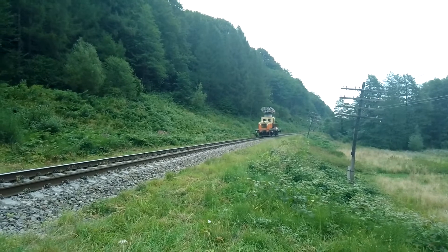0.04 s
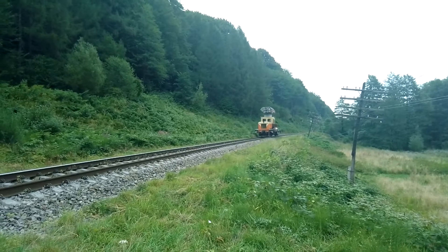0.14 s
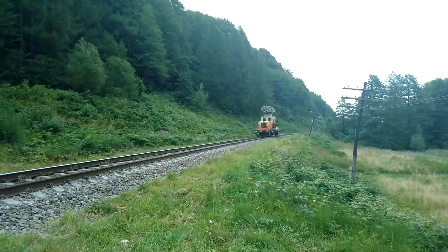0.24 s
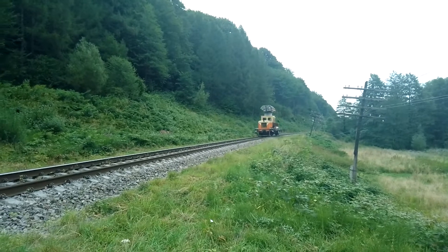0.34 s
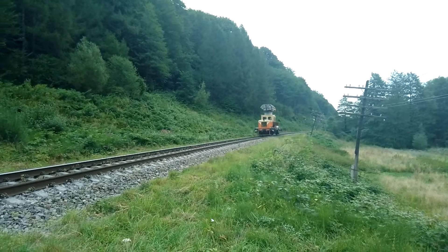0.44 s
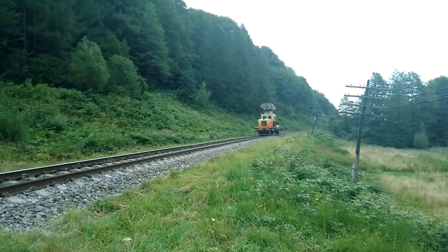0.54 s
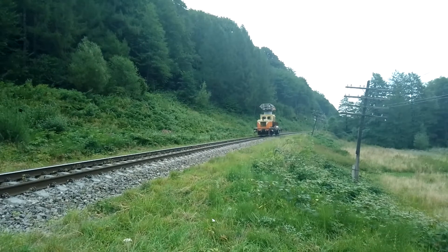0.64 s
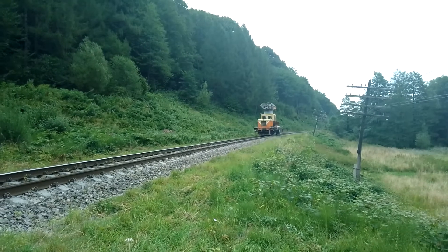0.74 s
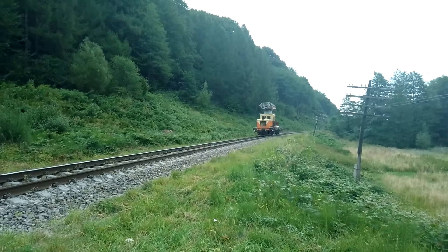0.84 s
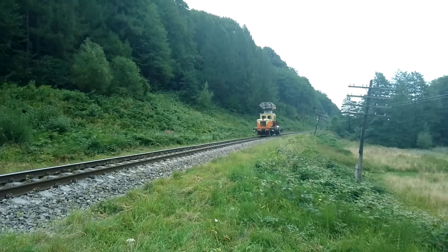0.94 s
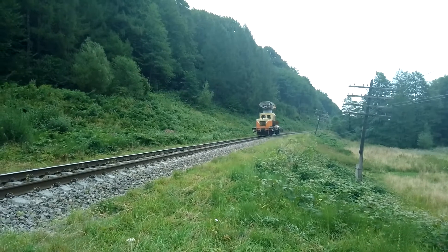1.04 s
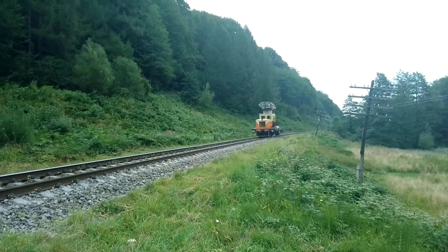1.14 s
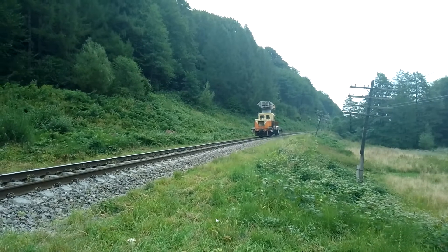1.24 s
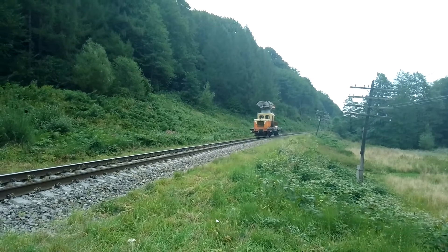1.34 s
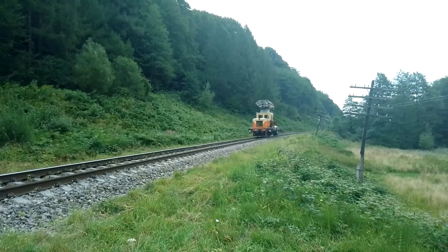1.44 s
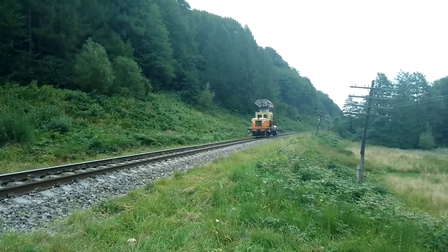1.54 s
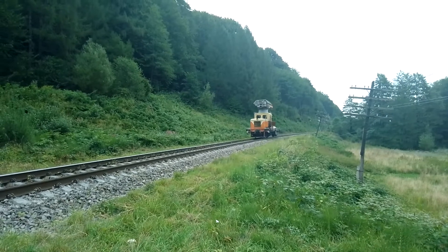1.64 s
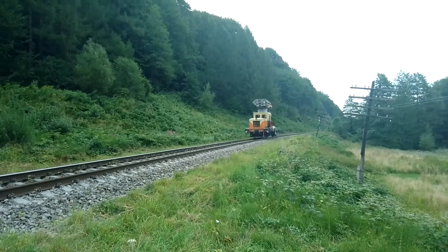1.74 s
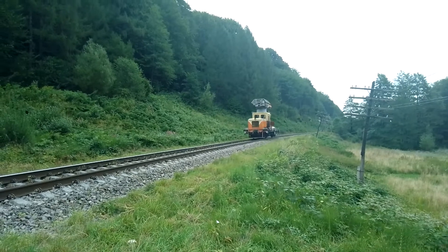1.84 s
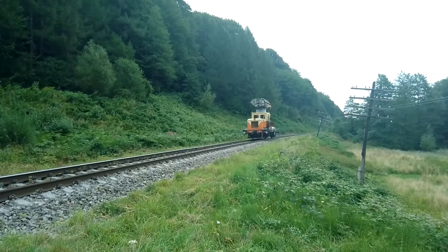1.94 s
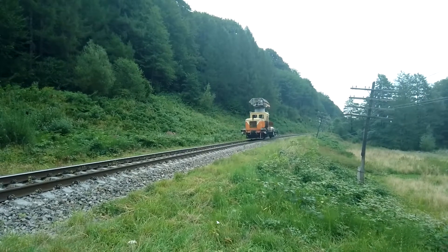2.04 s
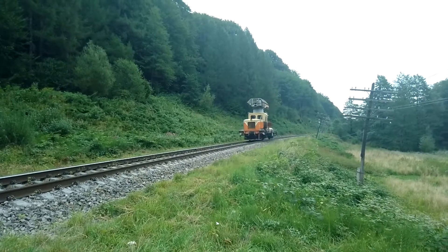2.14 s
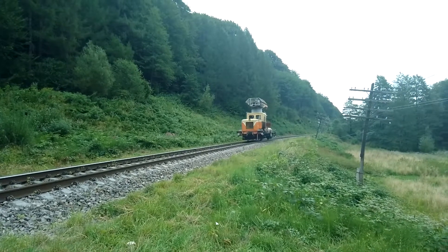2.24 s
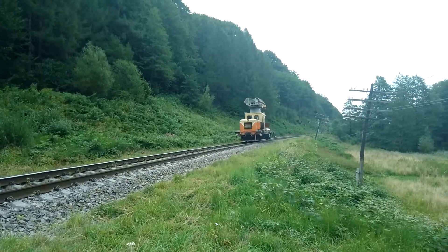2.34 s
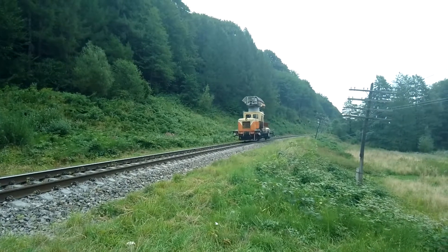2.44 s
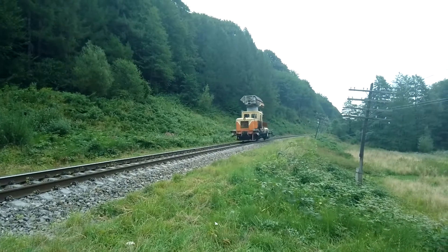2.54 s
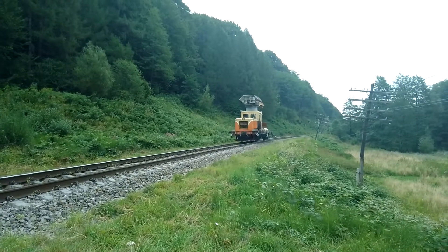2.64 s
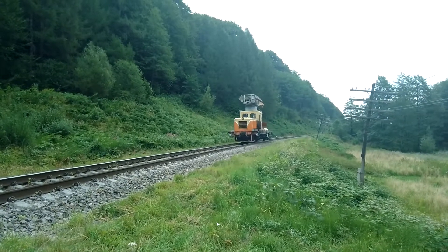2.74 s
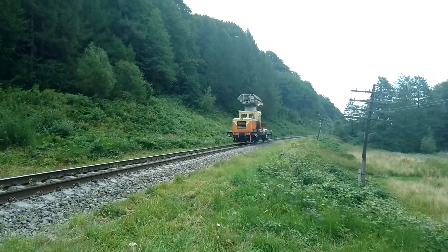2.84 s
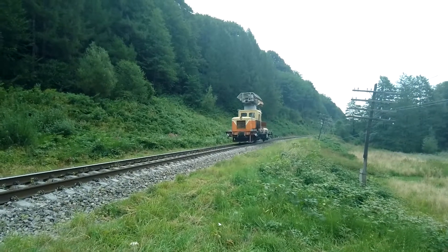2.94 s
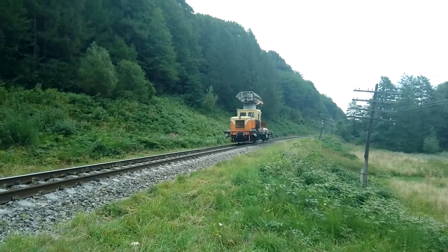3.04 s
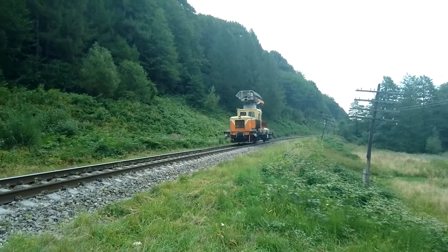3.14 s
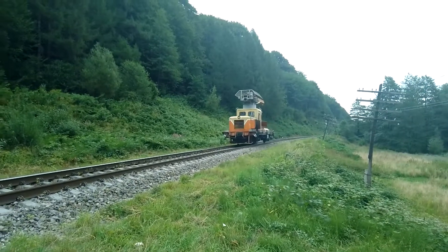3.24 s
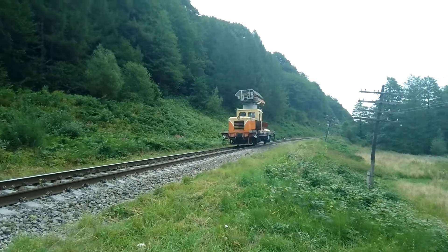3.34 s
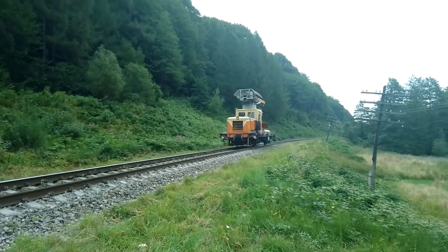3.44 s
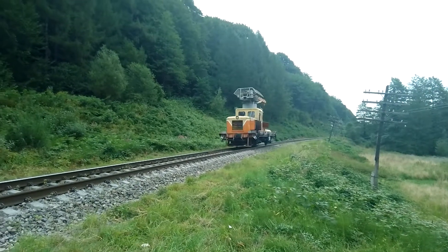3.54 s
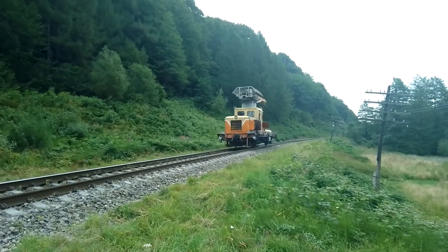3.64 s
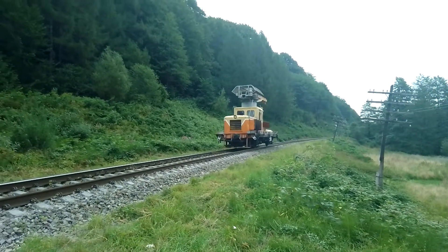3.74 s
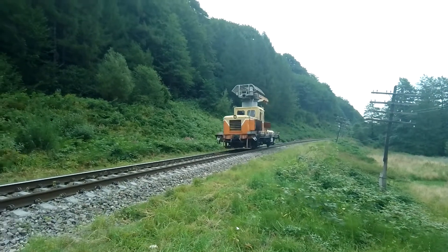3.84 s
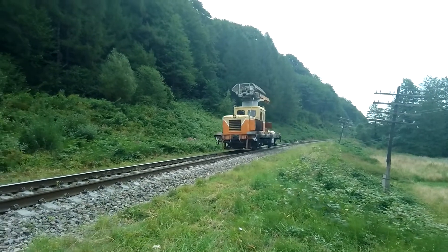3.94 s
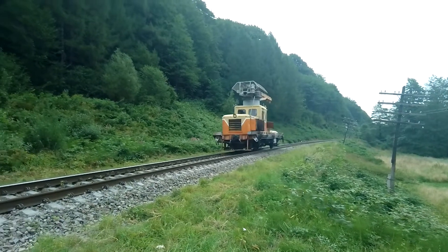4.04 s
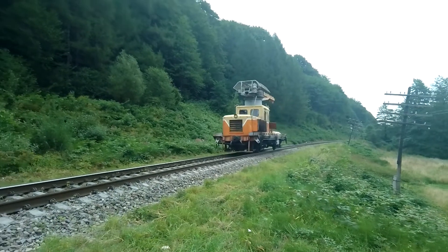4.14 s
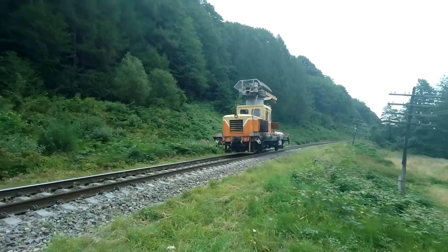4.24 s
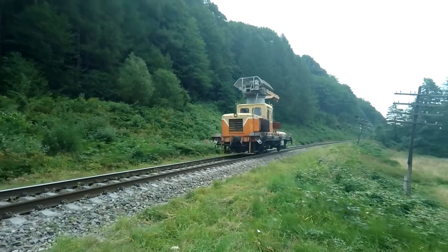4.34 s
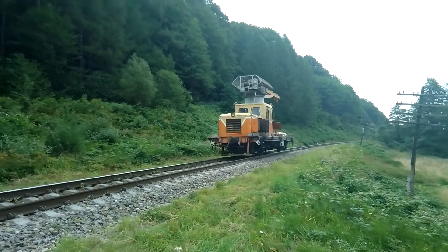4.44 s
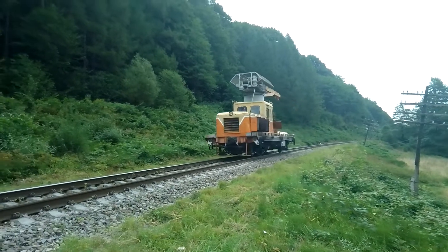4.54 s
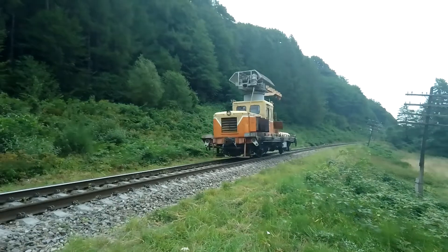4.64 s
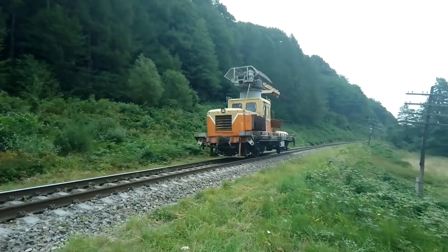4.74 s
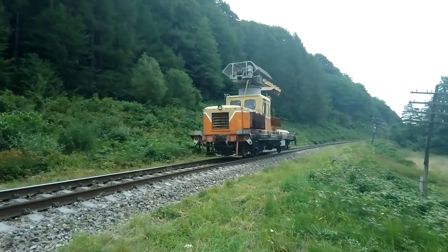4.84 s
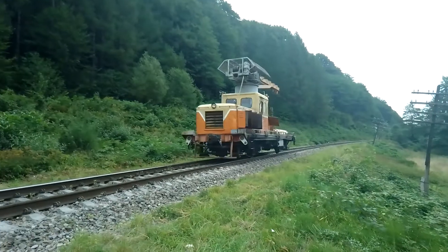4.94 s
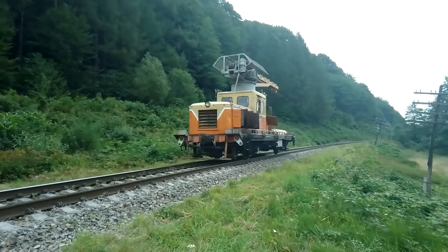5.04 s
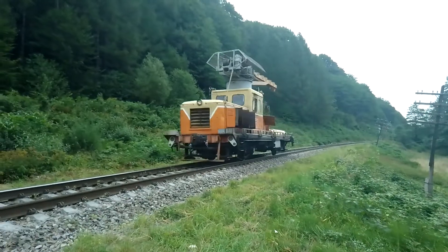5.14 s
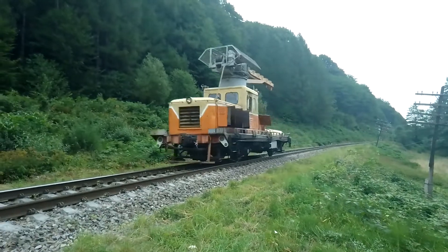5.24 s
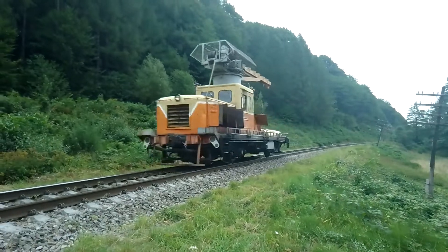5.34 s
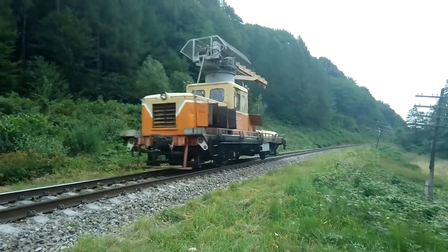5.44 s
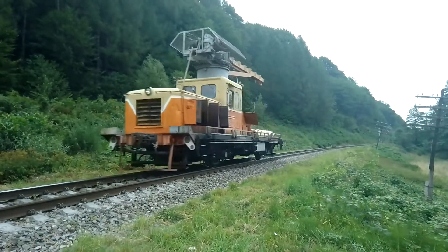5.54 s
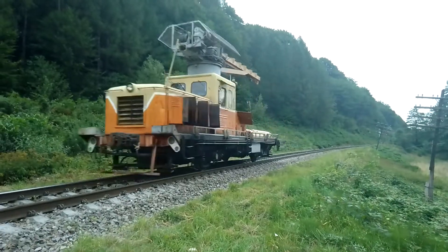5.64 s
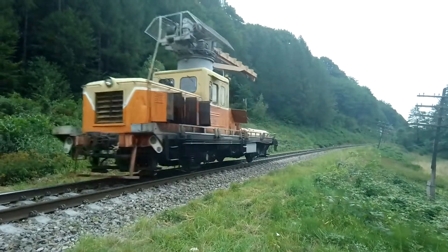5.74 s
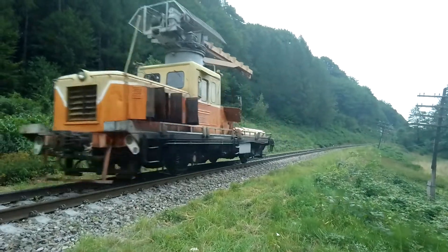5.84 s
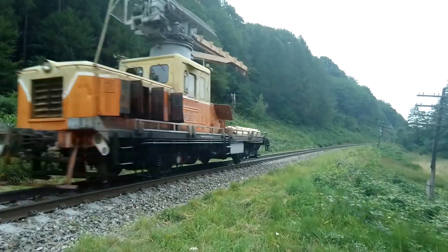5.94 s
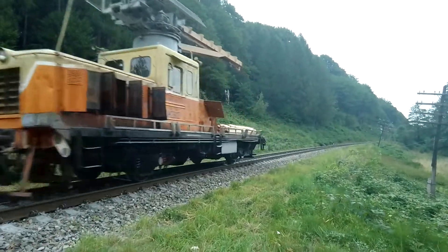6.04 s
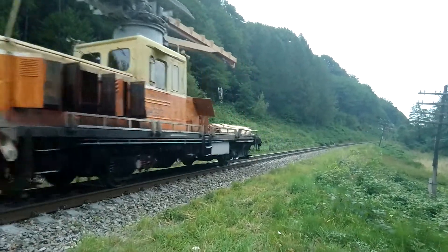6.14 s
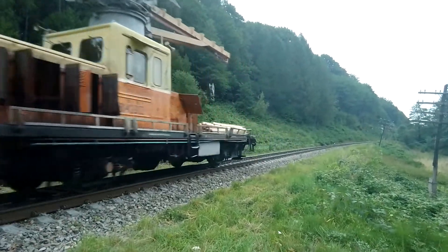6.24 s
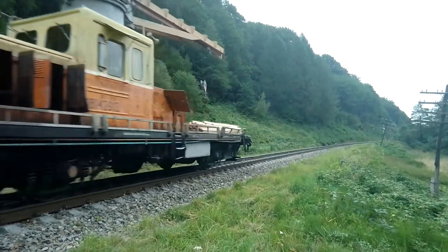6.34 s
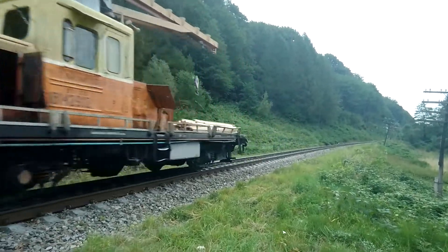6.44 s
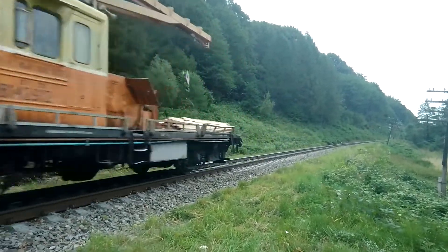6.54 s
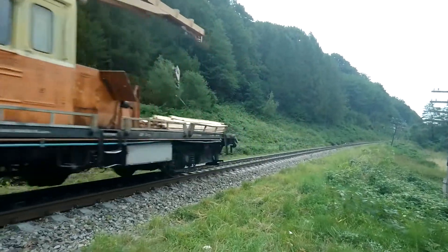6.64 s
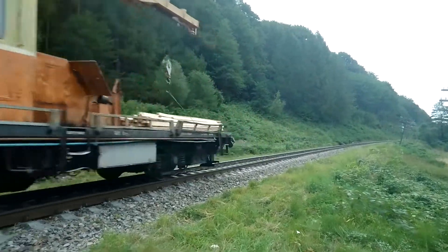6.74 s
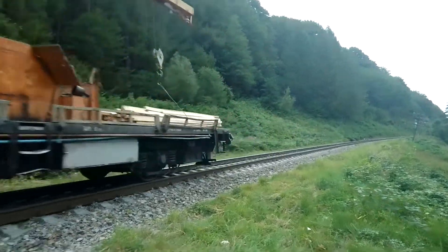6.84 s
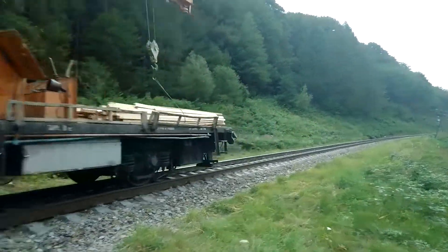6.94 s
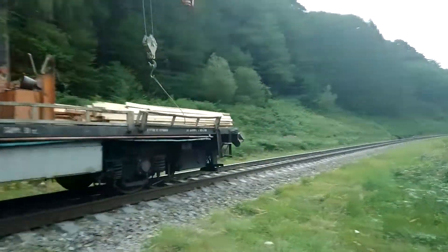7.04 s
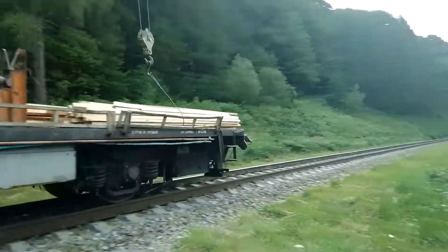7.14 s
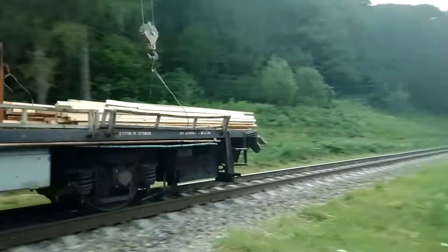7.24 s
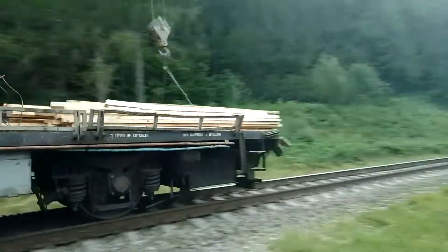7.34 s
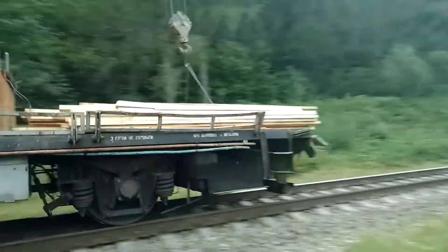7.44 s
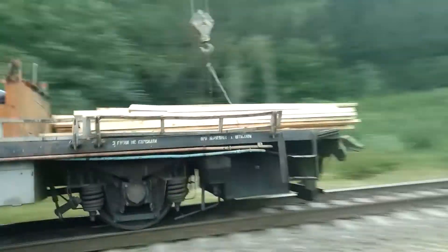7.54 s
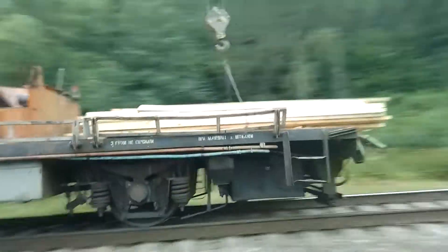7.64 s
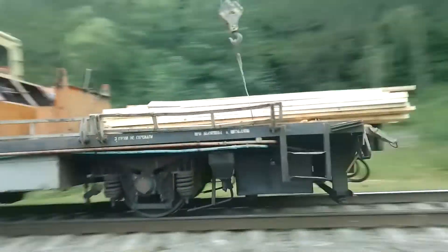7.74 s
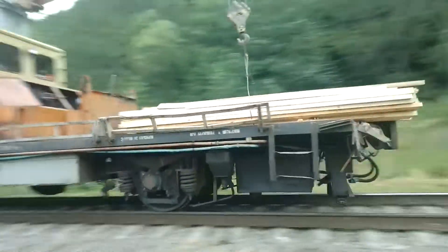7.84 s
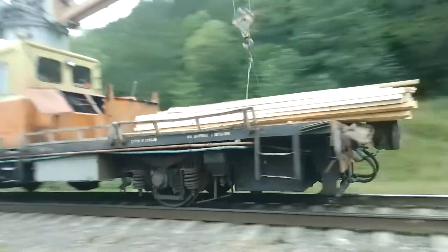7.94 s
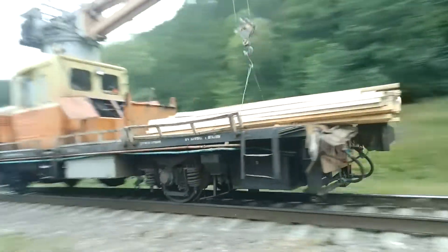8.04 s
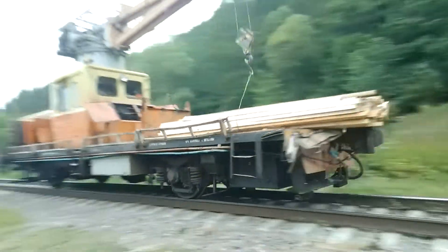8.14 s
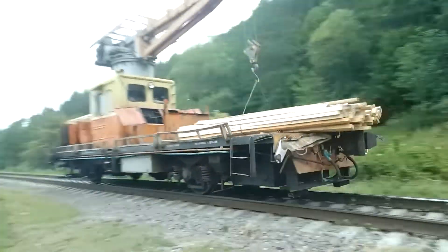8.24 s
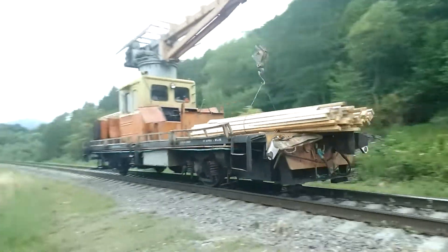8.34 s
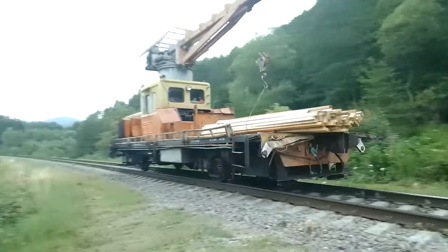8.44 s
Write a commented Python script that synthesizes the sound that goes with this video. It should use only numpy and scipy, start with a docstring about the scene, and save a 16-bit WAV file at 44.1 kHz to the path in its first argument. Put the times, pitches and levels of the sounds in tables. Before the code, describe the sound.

A diesel railcar chugs nearer along an outdoor track, growing loud and clanking as it passes, its pitch dipping slightly.

```python
"""A diesel railcar with a crane chuffs along a forest track, passes close by and draws away.
Its exhaust pulses once per engine cycle, a harmonic series over the roar of block, wheels and rails.
Gears hum, injectors and fan hiss, loose steel clanks, a valve cover pings and a light wind touches
the microphone. The Doppler effect lowers the pitch as the car goes by; spherical spreading and
loss over the grass weaken it with distance."""
import sys
import numpy as np
from scipy import signal
from scipy.fft import rfft, irfft, next_fast_len
from scipy.io import wavfile
from scipy.ndimage import uniform_filter1d, map_coordinates

SR = 44100
rng = np.random.default_rng(int(sys.argv[2]) if len(sys.argv) > 2 else 0)


def digitize_waveform(pressure):
    """Quantize a signal to 16-bit integers and store it at the path in sys.argv[1].

    Rows of a 2-D input are taken as channels; values are limited to [-1, 1].
    """
    field = np.atleast_2d(pressure).T
    bounded = np.clip(field, -1, 1)
    quanta = np.round(bounded * 32767).astype(np.int16)
    wavfile.write(sys.argv[1], SR, quanta)


N = 373968
TIME = np.arange(N) / SR
CYCLES_PER_S, SPEED_M_S, SOUND_M_S = 13.533, 9.24, 343
NEAREST_M, ABREAST_S = 8.4, 6.65

# Each row: harmonic of the cycle, then its level in dB in each view (far, nose close, abreast, behind).
EXHAUST_HARMONICS = [(2, -22, -30, -32, -31), (3, -6, -18.5, -18, -25), (4, -23, -24, -30, -18),
                     (5, -0.5, -12.5, -14, -19), (6, 2.5, -12.5, -8, -14.5), (7, -5, -18, -9.5, -12),
                     (8, -21.5, -6, -6, -17.5), (9, -55, -23.5, -10, -43), (10, -17.5, -23, -23, -26),
                     (11, -28.5, -2.5, -19, 1.5), (12, -44, -18, -21, -32), (13, -18, -18.5, -15, -19),
                     (14, -29, -12, -21.5, -11.5), (15, -18, -37, -21, -12), (16, -20.5, -18, -14.5, -13.5),
                     (17, -30, -17, -40, -9.5), (19, -52, -37, -34, -52), (22, -29, -48, -24.5, -12)]
# Turbulence in the pipe, one spectrum far and one near. Each point: frequency in Hz, relative level in dB.
PIPE_SPECTRA = [
    [(10, -22), (40, -6), (80, 0), (130, -4.5), (220, -5), (300, -25), (600, -74), (2000, -120)],
    [(10, -29), (40, -19), (90, -2.5), (150, 1), (230, -8.5), (310, -13.5), (600, -65.5), (2000, -120)],
]

def exhaust(cycle, view, level_db):
    """Superposition: one cylinder chuffs hardest, so the harmonics nearly align once a cycle."""
    chuff_at = blend(view, (.47, .5, .28, .45))  # share of the cycle
    angle = 2 * np.pi * (cycle - chuff_at)
    chuffs = np.zeros(N)
    for harmonic, *view_db in EXHAUST_HARMONICS:
        waver_db = 1.2 * wobble(4) + .15 * harmonic * wobble(16)
        smear_rad = rng.normal(1.3, .5) + .4 * wobble(2)
        chuffs += np.sqrt(2) * amp(blend(view, view_db) + waver_db) * np.cos(harmonic * angle + smear_rad)
    noise = patchy_noise(depth_db=2.5)
    rumble = blend(view, [coloured(noise, points) for points in PIPE_SPECTRA])
    rumble_db = blend(view, [-6.5, -7, -5, -5])
    return amp(level_db) * (chuffs + amp(rumble_db) * rumble)


# Block, wheels and rails, one spectrum per view. Each point: frequency in Hz, relative level in dB.
ROAR_SPECTRA = [
    [(150, -52), (260, -14), (480, -19.5), (670, -7.5), (800, -7.5), (920, -11.5), (1060, -15.5),
     (1400, -9.5), (1800, -20), (2600, -26), (3400, -51), (5700, -120)],
    [(150, -38), (260, -6), (500, -6), (640, 3), (875, 2), (1110, -9.5), (1390, -1.5), (1800, -11.5),
     (2600, -36), (3400, -43), (5700, -120)],
    [(150, -40), (260, -1.5), (440, -3), (570, -11), (800, -1), (1230, -10.5), (1600, -7), (2080, -15),
     (2600, -17), (3400, -40), (5700, -120)],
    [(150, -29), (260, -3), (390, -9), (500, -12), (850, -4.5), (1290, -14), (1610, -12), (2600, -22.5),
     (3400, -44), (5700, -120)],
]

def roar(cycle, view, level_db):
    """Amplitude modulation: the firings make the broad noise of block, wheels and rails throb a little."""
    noise = patchy_noise(depth_db=0.46)
    layers = [coloured(noise, points) for points in ROAR_SPECTRA]
    # Every view gets the same power in the middle band.
    layers = [x / np.std(filtered(x, lambda hz: (hz > 450) & (hz < 1900))) for x in layers]
    throb = pulses(cycle, count=3, at=0.898, sharp=0.051) * pulses(cycle, count=1, at=0.95, sharp=0.055)
    return amp(level_db + 0.84 * wobble(16)) * throb * blend(view, layers)


# Each row: multiple of the cycle, centre time and half length in seconds, level in dB against the roar.
GEAR_TONES = [(46.4, 1.4, 2, -17), (55.4, 0.75, 3.3, -9), (64.8, 0.84, 3.1, -13.5), (71.7, 3.3, 1.8, -17),
              (55.5, 6.3, 0.47, -5.5), (29.3, 6.15, 0.24, -14), (21.58, 7.0, 0.38, -12.5),
              (21.97, 7.6, 0.35, -4), (32.1, 7.94, 0.95, -9.5), (64, 8.6, 0.26, -12)]

def gears(cycle, level_db):
    """Periodic meshing of teeth gives unsteady tones, each heard over one stretch of the pass."""
    hum = np.zeros(N)
    for multiple, centre, half, db in GEAR_TONES:
        swell = amp(db + 2.5 * wobble(8)) * bell(centre, half, power=4)
        hum += swell * np.sin(2 * np.pi * multiple * cycle + 1.2 * wobble(12))
    return amp(level_db) * np.sqrt(2) * hum


# Injectors and fan, one spectrum per view. Each point: frequency in Hz, relative level in dB.
HISS_SPECTRA = [
    [(1000, -39), (1700, -24), (2000, -3.5), (2550, -4.5), (3050, -7), (3320, -6), (4150, -9.5),
     (4860, -18), (5600, -30), (6400, -32.5), (7500, -27), (10600, -55), (12500, -70), (15700, -66)],
    [(1000, -29), (1700, -14.5), (2100, 0), (2800, -3.5), (3600, -1.5), (4400, -7.5), (5500, -18.5),
     (6500, -26.5), (7600, -21.5), (10500, -37.5), (12000, -54), (15700, -44.5)],
    [(1000, -1.5), (1700, -5.5), (2090, -3.5), (2730, -5.5), (3820, -4), (5390, -16), (7820, -21.5),
     (11900, -47.5), (15700, -40)],
    [(1000, -2.5), (1700, -2.5), (2100, -5), (2700, -4.5), (3800, -2), (5400, -17.5), (7800, -22),
     (11900, -49), (15700, -47)],
]

def hiss(cycle, view, level_db):
    """Broadband noise of injectors and fan, weakly modulated by the firings."""
    noise = patchy_noise(depth_db=0.83)
    throb = pulses(cycle, count=3, at=0.8, sharp=0.055)
    flicker_db = 0.72 * wobble(16) + 0.76 * wobble(60)
    layers = [coloured(noise, points) for points in HISS_SPECTRA]
    return amp(level_db + flicker_db) * throb * blend(view, layers)


# Single blows of loose steel. Each row: start in seconds, body and treble levels in relative dB.
STEEL_CLANKS = [(4.541, -13, -24.5), (4.5604, -26, -30.5), (4.571, -16, -43), (4.7884, -15.5, -40),
                (4.8145, -22, -44), (5.0844, -25.5, -32), (5.243, -16, -22.5), (5.6184, -13, -41),
                (6.1878, -7, -35), (6.4812, -2.5, -24.5), (6.634, -4.5, -20), (6.7894, -3, -24),
                (6.9227, -12, -39), (7.0814, -3.5, -39), (7.2284, -8.5, -41), (7.6156, -10, -38),
                (7.644, -9, -35), (7.6744, -9, -32), (7.7493, -6, -28)]
# A part knocks once a cycle. Each row: start and end in seconds, body and treble levels in relative dB.
KNOCK_SPELLS = [(5.75, 6.4, -10, -42), (7.3, 7.6, -5.5, -37), (7.83, 8.35, -9, -41)]
# Resonances of the frame. Each row: frequency in Hz, bandwidth in Hz, relative level in dB.
FRAME_MODES = [(420, 120, 0.5), (774, 184, 9), (1570, 480, 2.5), (2300, 150, 2.5), (3550, 1200, -3.5)]

def loose_steel(cycle):
    """Impact excitation: each blow sets off a decaying rattle in the frame and a shorter bright edge."""
    def frame_response(hz):
        modes = sum((-1) ** k * amp(db) * 1j * hz * width / (centre ** 2 - hz ** 2 + 1j * hz * width)
                    for k, (centre, width, db) in enumerate(FRAME_MODES))
        return modes / (1 + (hz / 5500) ** 4)

    clank_t60_s, knock_t60_s = 0.12, 0.088
    knock_times = once_a_cycle(cycle, at=.26) / SR
    scatter_db = rng.normal(0, 2, len(knock_times))
    blows = [(*row, clank_t60_s) for row in STEEL_CLANKS]
    for start, end, body_db, treble_db in KNOCK_SPELLS:
        blows += [(when, body_db + db, treble_db + db, knock_t60_s)
                  for when, db in zip(knock_times, scatter_db) if start < when < end]
    body, edge = np.zeros((2, N + SR))
    age = np.arange(SR // 4) / SR
    rise = 1 - np.exp(-(age / 0.0046) ** 2)
    for start, body_db, treble_db, t60 in blows:
        body[round(start * SR):][:len(age)] += amp(body_db - 60 * age / t60) * rise
        edge[round(start * SR):][:len(age)] += amp(treble_db - 60 * age / (0.44 * t60)) * rise
    rattle = unit(filtered(rng.standard_normal(N), frame_response))
    treble_spectrum = [(3000, -23), (5000, -3.5), (8000, 0), (11500, -23.5), (15500, -33)]
    treble = coloured(rng.standard_normal(N), treble_spectrum)
    return amp(-6.5) * body[:N] * rattle + amp(-4.5) * edge[:N] * treble


# Each row: frequency in Hz, time to decay by 60 dB in seconds, then relative level in dB in each view.
COVER_MODES = [(2320, .1, 5, -9, -4, -9), (2430, .06, -2, -9, 2, -8), (2760, .045, -5, -2, -7, -8),
               (3270, .06, -4, -6, -8, -8)]

def valve_cover(cycle, view, level_db):
    """Damped free vibration: a valve strikes once a cycle and each mode rings at a new strength."""
    strikes = once_a_cycle(cycle, at=.8)
    view = np.interp(view, [0, .75, .93, 1, 3], [0, 0, 1, 1, 3])  # the colour turns late in the approach
    age = np.arange(SR // 10) / SR
    rise = 1 - np.exp(-(age / .002) ** 2)
    pings = np.zeros(N)
    for hz, t60, *view_db in COVER_MODES:
        blows = np.zeros(N)
        blows[strikes] = amp(rng.normal(0, 3.5, len(strikes)))
        ring = rise * amp(-60 * age / t60) * np.sin(2 * np.pi * hz * age)
        pings += amp(blend(view, view_db)) * unit(signal.fftconvolve(blows, ring)[:N])
    return amp(level_db - 12) * pings


# Each row: centre time in seconds, level in dB, half length in seconds.
WIND_PUFFS = [(1.65, -36, 0.094), (2.5, -47, 0.023), (2.417, -38, 0.15), (2.874, -27.5, 0.038),
              (5.204, -23, 0.015), (5.35, -35, 0.049), (6.645, -28, .06)]

def wind():
    """Turbulent pressure at the microphone makes short puffs of low noise."""
    puffs = sum(amp(db) * bell(centre, half) for centre, db, half in WIND_PUFFS)
    spectrum = [(15, -20), (40, -7), (120, 13.5), (250, -4.5), (600, -48.5), (2000, -120)]
    return puffs * coloured(rng.standard_normal(N), spectrum)


def amp(db):
    """Amplitude ratio of a level in dB."""
    return 10 ** (np.asarray(db) / 20)


def unit(x):
    """Normalisation to rms 1."""
    return x / np.sqrt(np.mean(x ** 2) + 1e-20)


def bell(centre_s, half_s, power=2):
    """A Gaussian envelope; a higher power flattens its top."""
    return np.exp(-((TIME - centre_s) / half_s) ** power)


def wobble(rate):
    """Spline interpolation through random knots, rate of them a second."""
    return map_coordinates(rng.standard_normal(int(N * rate / SR) + 4), [TIME * rate])


def filtered(x, response):
    """Linear filtering: the spectrum of x times a frequency response."""
    size = next_fast_len(N + SR // 2)
    return irfft(rfft(x, size) * response(np.fft.rfftfreq(size, 1 / SR)), size)[:N]


def coloured(x, points):
    """Spectral shaping through (Hz, dB) points on a log frequency axis, at rms 1."""
    knots_hz, db = np.transpose(points)
    return unit(filtered(x, lambda hz: amp(np.interp(np.log(hz + 1), np.log(knots_hz), db))))


def patchy_noise(depth_db):
    """White noise modulated by patches of random gain in time and frequency."""
    spectra = signal.stft(rng.standard_normal(N + 512), nperseg=512)[2]
    patches = uniform_filter1d(rng.standard_normal(spectra.shape), size=4, axis=0)
    patches = uniform_filter1d(patches, size=8, axis=1)
    return signal.istft(spectra * amp(depth_db * unit(patches)), nperseg=512)[1][:N]


def blend(view, layers):
    """Linear cross-fade through the layers as view runs 0, 1, 2 .."""
    view = np.clip(view, 0, len(layers) - 1)
    return sum(np.maximum(1 - abs(view - k), 0) * layer for k, layer in enumerate(layers))


def pulses(cycle, count, at, sharp):
    """A periodic gain of rms 1 with count bumps a cycle."""
    return unit(np.exp(sharp * np.cos(2 * np.pi * count * (cycle - at))))


def once_a_cycle(cycle, at):
    """The samples at which the engine passes a given share of its cycle."""
    return np.flatnonzero(np.diff(np.floor(cycle - at)))


# Brief swells and dips as the parts of the car go by.
# Each row: centre time and half length in seconds, then change in dB of exhaust, roar and hiss.
PASSING_SWELLS = [(4.35, 0.48, 1, 1.5, 0.5), (5.235, 0.075, 0.5, 2.5, 2), (5.575, 0.059, 0.5, 0.5, 3),
                  (6.348, 0.16, -1, -0.5, -0.5), (6.72, 0.2, -2, 0.5, 2), (7.15, 0.12, 1, 1, 0),
                  (7.413, 0.055, 3, -2.5, -1.5), (7.645, 0.054, -0.5, 2.5, -0.5),
                  (7.825, 0.03, 0.5, -1, -2), (8.08, 0.068, -2, -1.5, -1)]

def levels(metres, view):
    """Inverse-square law, ground loss and directivity set the dB levels of exhaust, roar and hiss."""
    # Each source in the four views, as if at the nearest point of the track.
    nearest_db = (-18.5, -13.5, -17, -12), (-19, -19, -20, -16.5), (-23.5, -25, -22, -22)
    grass_db_per_m = (0.0674, 0.0346, 0.0624)
    facing_db = np.array([blend(view, db) for db in nearest_db])
    spreading_db = 20 * np.log10(metres / NEAREST_M)
    grass_db = np.outer(grass_db_per_m, metres - NEAREST_M)
    swell_db = sum(np.outer(db, bell(centre, half)) for centre, half, *db in PASSING_SWELLS)
    return facing_db - spreading_db - grass_db + swell_db


# How the car faces the listener. Each row: time in seconds, view (0 far, 1 nose close, 2 abreast, 3 behind).
VIEW_PATH = [(0, 0.41), (1.0, 0.32), (3.2, 0.69), (5.3, 0.97), (6.15, 1.27), (6.65, 2.184), (7.2, 2.2),
             (8.0, 2.94), (8.48, 3)]

def scene():
    """Doppler effect: the changing travel time of the sound shifts the engine cycle as it is heard."""
    metres = np.hypot(NEAREST_M, SPEED_M_S * (TIME - ABREAST_S))
    cycle = CYCLES_PER_S * (TIME - (metres - metres[0]) / SOUND_M_S)
    view = np.interp(TIME, *np.transpose(VIEW_PATH))
    exhaust_db, roar_db, hiss_db = levels(metres, view)
    car = exhaust(cycle, view, exhaust_db) + roar(cycle, view, roar_db) + gears(cycle, roar_db)
    car += hiss(cycle, view, hiss_db) + valve_cover(cycle, view, hiss_db) + loose_steel(cycle)
    return (car + wind())[None]


def record(dry):
    """Soft saturation rounds the highest peaks; a band limit and a small constant offset follow."""
    ceiling, top_hz, offset = .78, 15720, -.023
    rounded = dry[0] / (1 + abs(dry[0] / ceiling) ** 5) ** (1 / 5)
    return filtered(rounded, lambda hz: hz < top_hz)[None] + offset


dry = scene()
out = record(dry)
digitize_waveform(out)
```